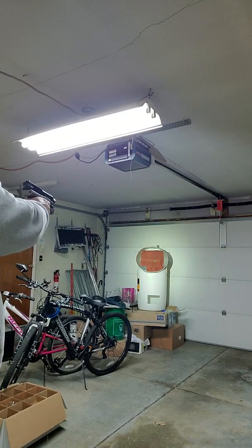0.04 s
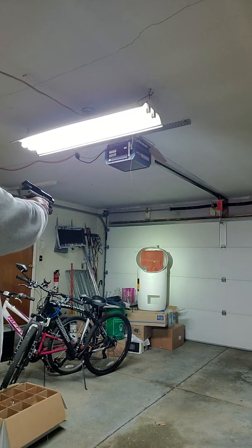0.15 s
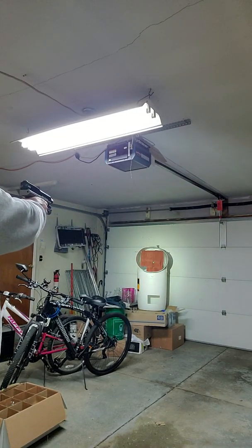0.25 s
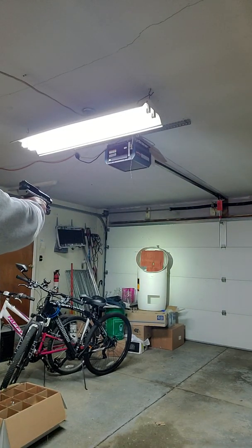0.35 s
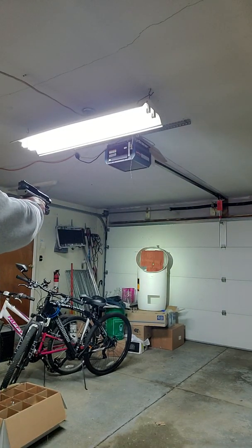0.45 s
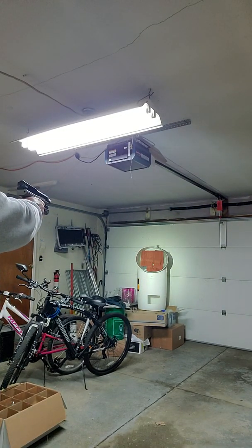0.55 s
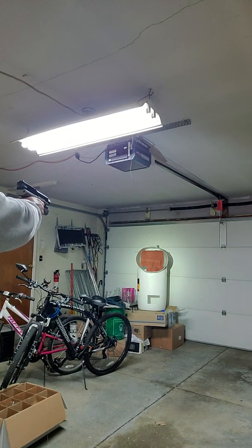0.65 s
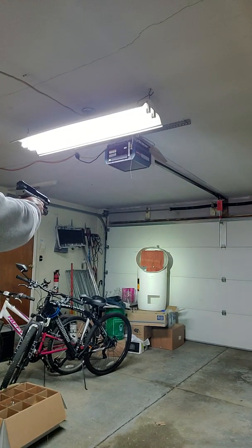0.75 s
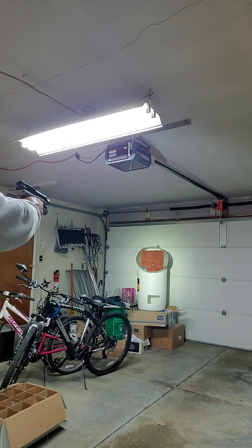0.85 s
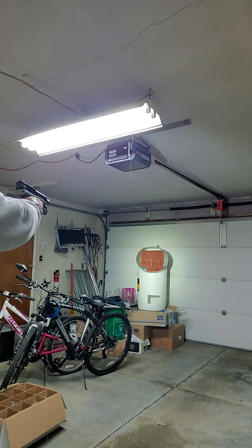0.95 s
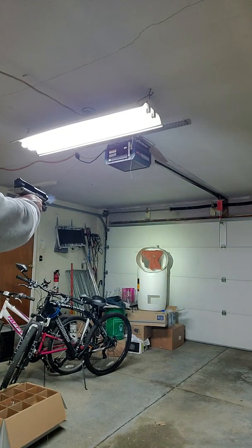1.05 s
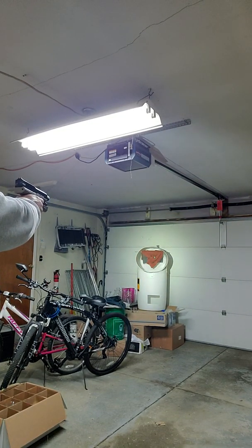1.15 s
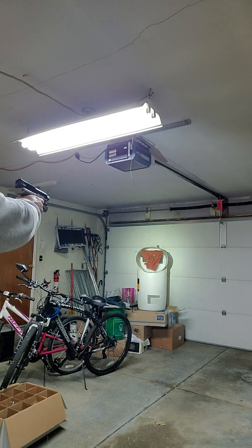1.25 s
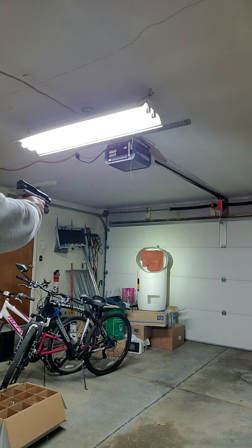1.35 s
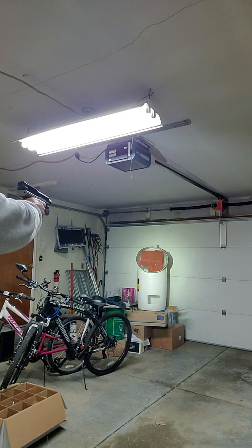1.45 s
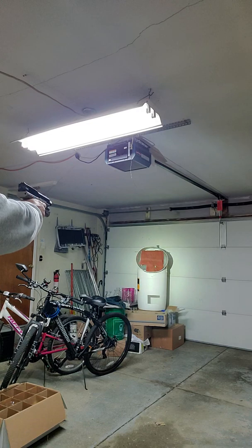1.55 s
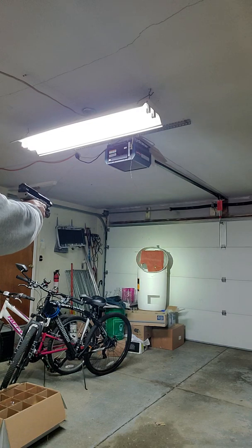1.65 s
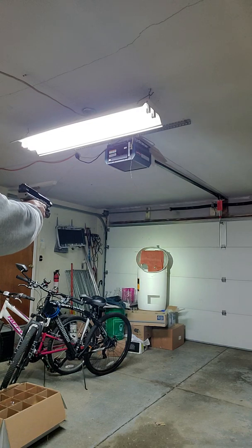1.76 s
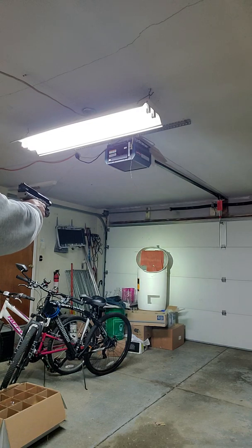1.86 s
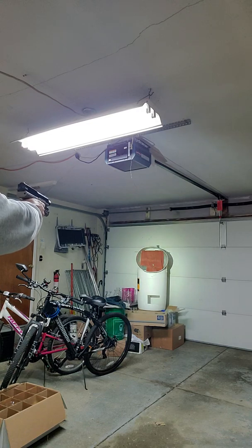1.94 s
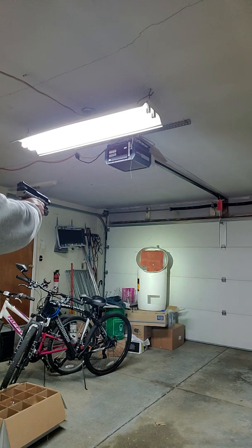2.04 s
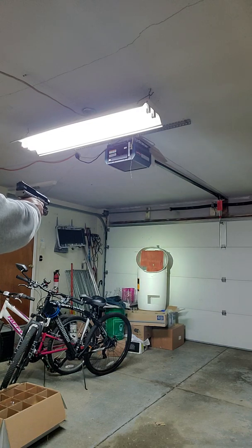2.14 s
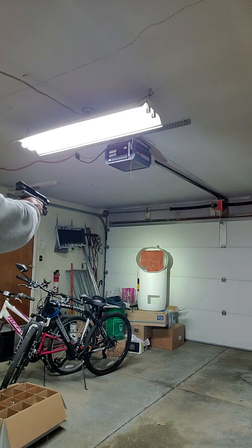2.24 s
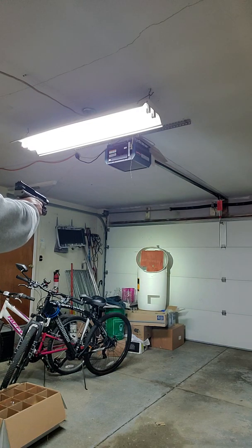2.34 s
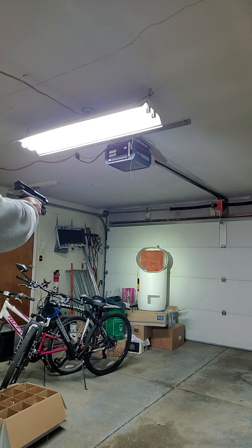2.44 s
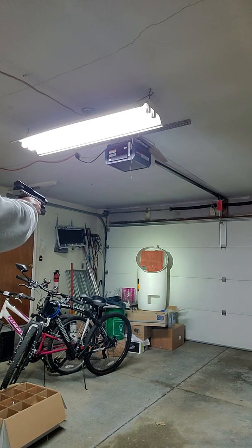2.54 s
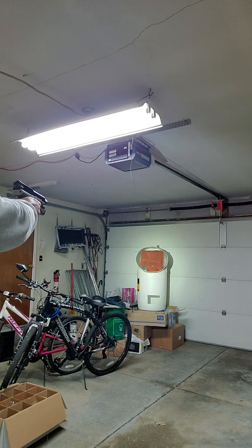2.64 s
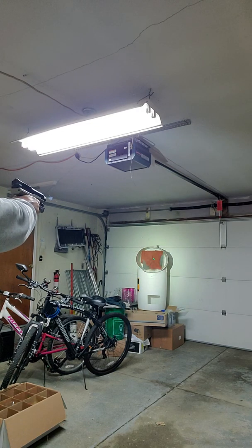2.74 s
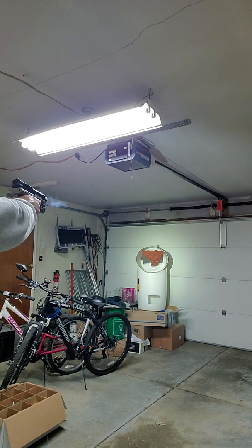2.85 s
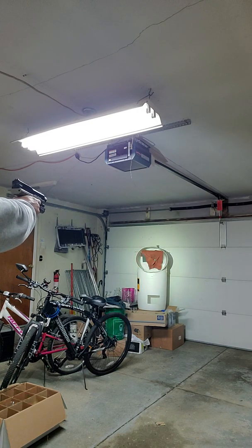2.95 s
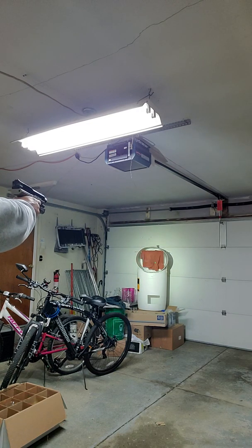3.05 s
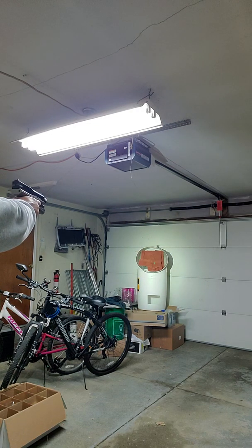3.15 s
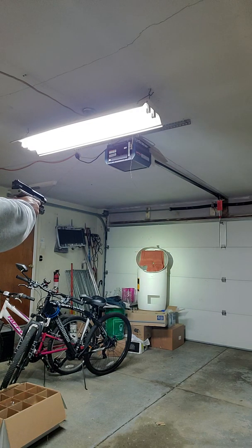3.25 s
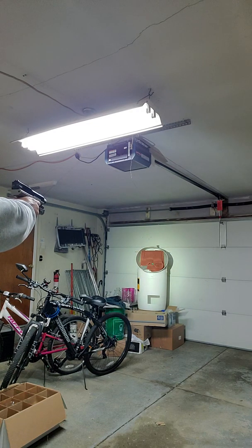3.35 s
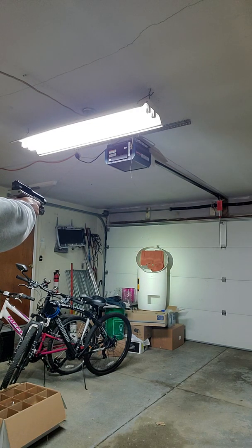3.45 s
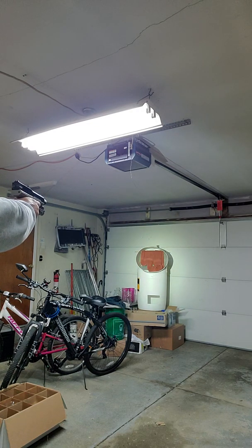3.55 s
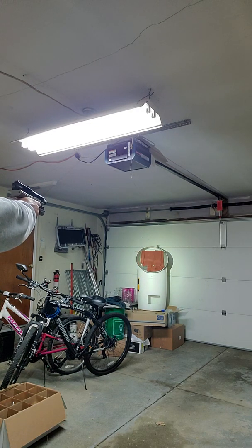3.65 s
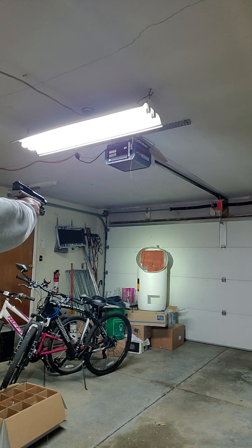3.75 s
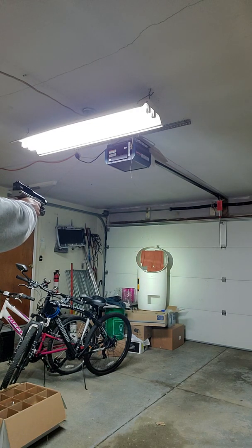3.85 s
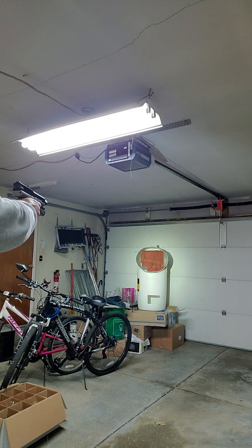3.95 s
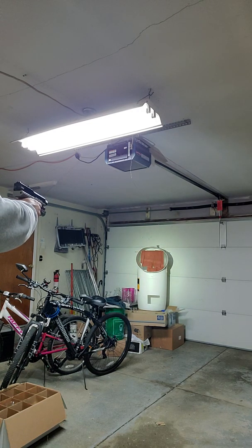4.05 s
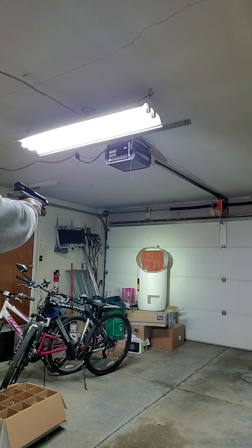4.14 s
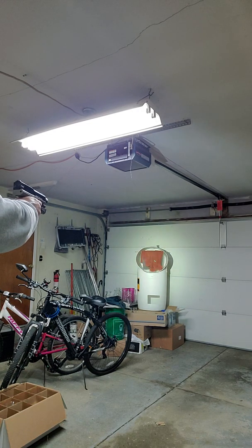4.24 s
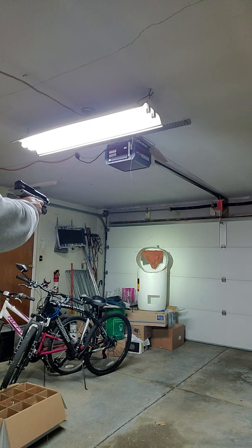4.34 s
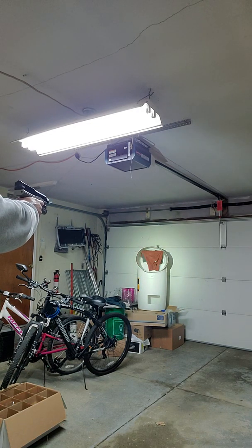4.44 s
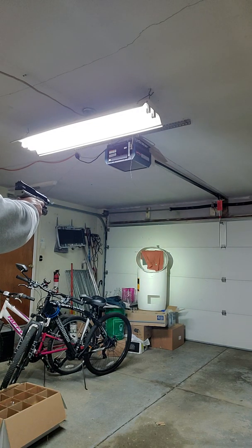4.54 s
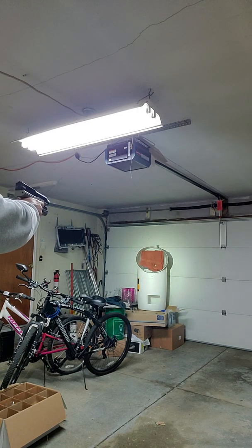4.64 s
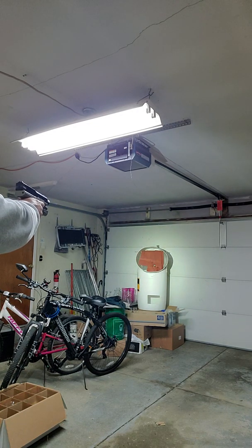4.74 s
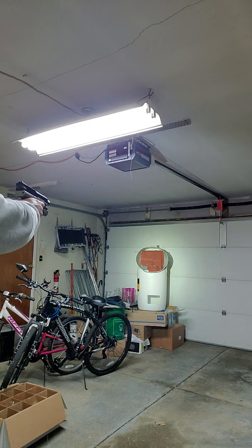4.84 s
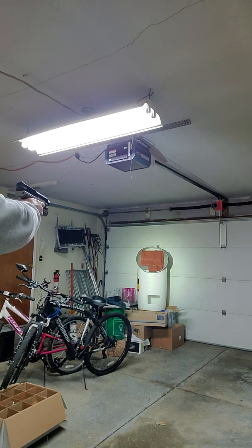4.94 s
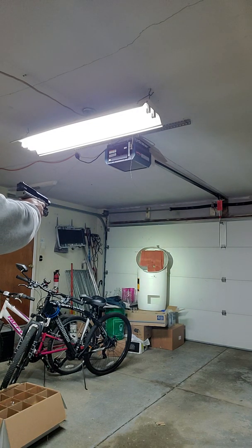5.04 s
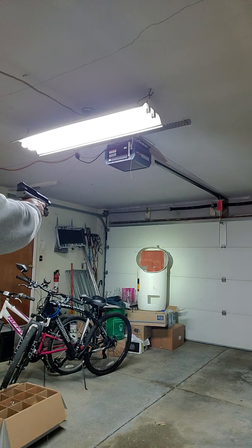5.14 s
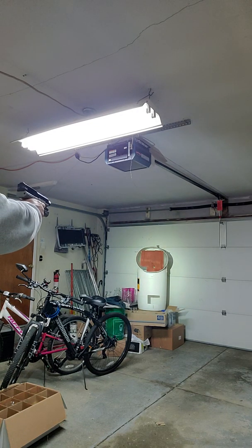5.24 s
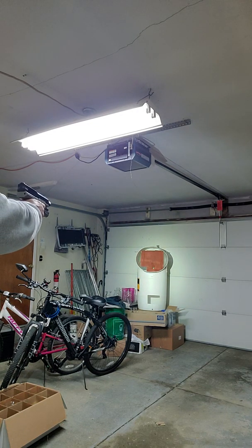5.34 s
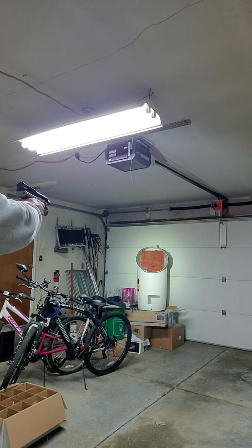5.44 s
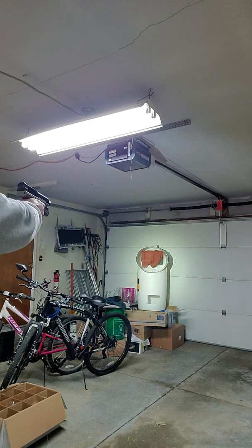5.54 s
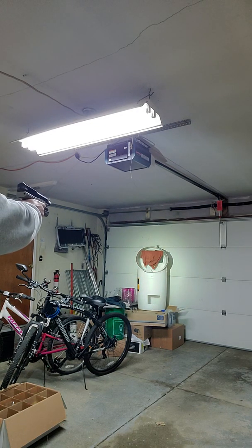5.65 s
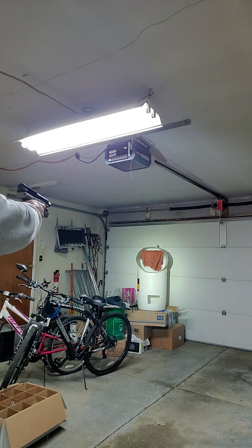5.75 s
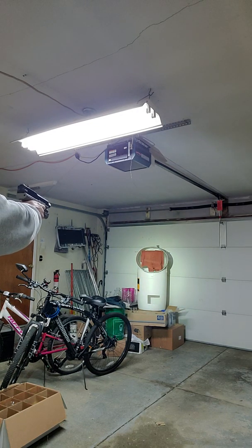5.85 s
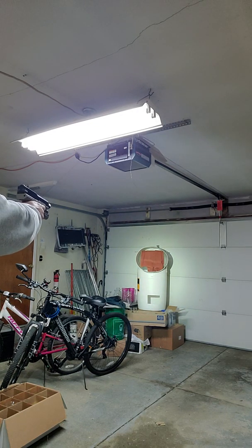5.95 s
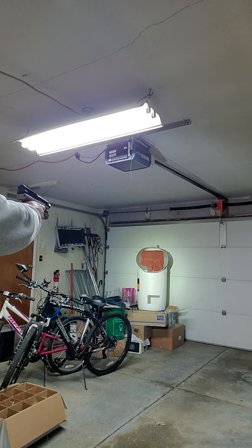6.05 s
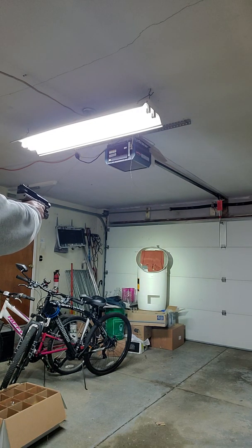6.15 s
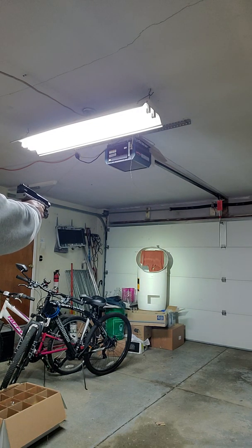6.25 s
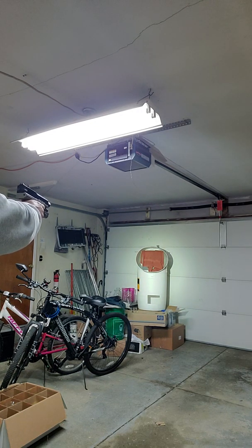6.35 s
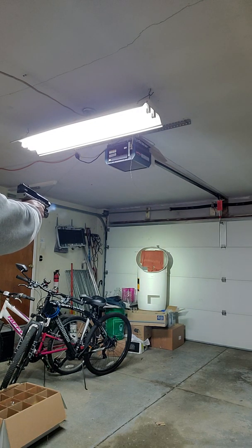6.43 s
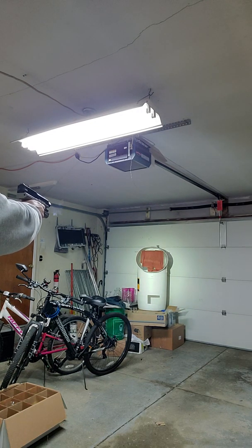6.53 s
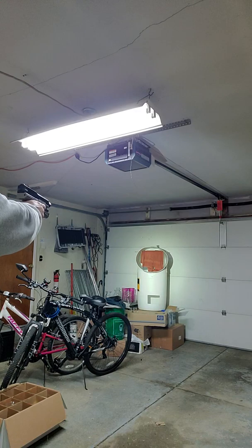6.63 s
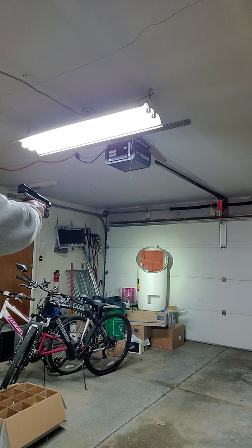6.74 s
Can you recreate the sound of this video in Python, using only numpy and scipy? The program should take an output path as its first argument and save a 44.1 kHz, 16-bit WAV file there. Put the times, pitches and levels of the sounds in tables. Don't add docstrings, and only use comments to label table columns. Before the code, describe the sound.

Five sharp gas-pistol shots crack in a concrete garage, each thumping a hollow target, with balls clacking and knocking around afterwards.

```python
import sys
import numpy as np
from scipy import signal
from scipy.fft import rfft, irfft
from scipy.io import wavfile
from scipy.ndimage import uniform_filter1d

SR = 44100
rng = np.random.default_rng(int(sys.argv[2]) if len(sys.argv) > 2 else 0)


def linear_from_db(decibels):
    return 10 ** (np.asarray(decibels, float) / 20)


def to_wav(sig):
    pcm = np.clip(np.atleast_2d(sig), -1, 1) * 32767
    pcm = np.round(pcm).astype(np.int16)
    wavfile.write(sys.argv[1], SR, pcm.T)


N = 299483
SPAN = 1 << 15
HZ, T = np.fft.rfftfreq(SPAN, 1 / SR), np.arange(SPAN) / SR
LEAD_IN_S = 0.04


def shot(blast_db, thump_db, cold, near, far):
    return heard(gun(blast_db, cold), near) + linear_from_db(thump_db) * heard(target(cold), far)


def gun(blast_db, cold):
    # (frequency [Hz], level [dB])
    blast_colour = [(35, -39.5), (60, -2), (809, -1), (1470, -5), (3240, -3.5), (6000, -16), (7800, -42),
                    (13200, -120)]
    # (frequency [Hz], level [dB])
    jet_colour = [(500, -22.5), (1500, -8), (3200, 5.5), (5000, 2.5), (7000, 8.5), (8500, -1.5),
                  (12000, -6.5), (16000, -2.5)]
    # (frequency [Hz], change [dB])
    chill = [(1000, -5), (3000, -11), (6000, 5.5), (8500, 7), (12500, 9)]
    valve_colour = [(300, 8.5), (1000, -9.5), (2000, 6.5), (3400, 3.5), (5000, -7.0), (14000, -30.5)]

    blast = colour(click(LEAD_IN_S), [(f, db + cold * read(chill, f)) for f, db in blast_colour])
    since = T - LEAD_IN_S
    leak = np.exp(np.minimum(since + 0.0067, 0) / 0.0052) * (since < 0)
    valve = puff(linear_from_db(-13 - 5.9 * cold) * leak, valve_colour)
    gust = np.exp(-np.maximum(since, 0) / 0.0032) * (since >= 0)
    jet = puff(gust, [(f, db + cold * read(chill, f)) for f, db in jet_colour])
    jet_db = -18.5 + 2.5 * cold
    return linear_from_db(blast_db) * blast / abs(blast).max() + linear_from_db(jet_db) * (jet + valve)


def target(cold):
    # (frequency [Hz], level [dB])
    slap_colour = [(40, -22), (110, -3), (220, -8), (380, 1.5), (560, -12), (1000, 1.5), (1700, -7),
                   (10000, -39)]
    # (frequency [Hz], change [dB])
    chill = [(100, 2), (200, 7.5), (400, 2), (750, -0.5), (1200, -14), (2800, -0.5), (5800, 22.5),
             (9000, -8.5)]
    # (frequency [Hz], level [dB], t60 [s])
    hollow_modes = [(68.6, -14.5, 0.32), (93.1, -8.5, 0.31), (110.6, 9, 0.21), (240, 5.5, 0.05),
                    (320, -3.5, 0.043), (359, 7.5, 0.44), (430, 3, 0.087), (478, 7, 0.18), (615, 1.5, 0.17),
                    (694, 4.5, 0.28), (783, 2, 0.2), (1110, -4.5, .15)]

    slap = colour(colour(click(), slap_colour), [(f, cold * db) for f, db in chill])
    boom = sum(ring(*mode) for mode in hollow_modes)
    thump = slap / abs(slap).max() + linear_from_db(-16.0) * boom / abs(boom).max()
    flight_s = .0265 - .0048 * cold ** 2
    return np.roll(thump, round((LEAD_IN_S + flight_s) * SR))


def bounce(db, thud_db, crack_db, fizz_db):
    ball_hz = 1115
    modes = [(ball_hz, 0, .012), (ball_hz * .6, -6, .02), (2900, 1.5, .006)]
    path = garage(rise_s=0.0054, early_db=5.0, early_s=0.036)
    return hit(db, ball_hz, thud_db, crack_db, fizz_db, modes, -18, path)


def knock(db, low_hz, crack_db, fizz_db):
    modes = [(low_hz, 0, 22 / low_hz), (low_hz * 1.28, -1, 17 / low_hz)]
    path = garage(rise_s=0.0087, early_db=8.5, early_s=.02)
    return hit(db, low_hz, -32.5, crack_db, fizz_db, modes, 1.0, path)


def hit(db, hz, thud_db, crack_db, fizz_db, modes, ring_db, path):
    # (frequency [Hz], level [dB])
    bass_loss = [(40, -44.5), (150, -4), (320, -6.5)]
    tick_colour = [(45, thud_db - 0.5), (110, thud_db + 22.5), (200, thud_db + 21.0),
                   (340, thud_db / 2 + 8), (hz, 0), (3000, crack_db + 0.5),
                   (6500, (crack_db + fizz_db) / 2 + 5.0), (12000, fizz_db - 0.5)]
    tick = colour(click(), sorted(tick_colour))
    rings = colour(sum(ring(*mode) for mode in modes), bass_loss)
    rings = colour(rings, [(0.6 * hz, -12), (0.9 * hz, 0)])
    dry_hit = tick / np.linalg.norm(tick) + linear_from_db(ring_db) * rings / np.linalg.norm(rings)
    sound = heard(dry_hit, path)
    return linear_from_db(db - 2.0) * sound / abs(sound.mean(0)).max()


def note(hz, db, t60, path):
    modes = ring(hz, db, t60) + ring(hz * 0.95, db - 4.0, t60 * .6) + ring(hz * .93, db - 5.0, t60 * 0.48)
    tone = modes * (1 - np.exp(-T / 0.0048))
    sound = heard(tone, path)
    return sound * abs(tone).max() / abs(sound).max()


def rattle(db, hz):
    path = garage(rise_s=0.015, early_db=14.5, early_s=0.047)
    return hit(db, hz, -25.5, 1.5, -35, [(hz, 0, .006)], -6.5, path)


def gun_spot():
    # (delay [s], level [dB])
    wall_echoes = [(.0025, 2), (.006, -19), (0.0085, -12), (0.02, -26)]
    walls = click() + sum(linear_from_db(db) * click(s) for s, db in wall_echoes)
    tail = garage(rise_s=0.0011, early_db=-5.5, early_s=0.003, lumpy_db=-0.85)
    return walls * [[1], [.8]] + linear_from_db(12.5) * tail


def target_spot():
    # (delay [s], level [dB])
    slap_echoes = [(.0012, -2), (.0039, -9.5), (.0068, -3.5), (.0087, -8), (0.009, -11.5)]
    slaps = click() + sum(linear_from_db(db) * click(s) for s, db in slap_echoes)
    tail = garage(rise_s=0.0017, early_db=9.0, early_s=.012, lumpy_db=-1.5)
    return slaps * [[1], [.8]] + linear_from_db(12.0) * tail


def garage(rise_s, early_db, early_s, patchy_db=1.0, lumpy_db=4.0):
    # (frequency [Hz], t60 [s])
    room_decay = [(60, 0.65), (160, 0.47), (420, 0.7), (1100, 0.58), (2500, 0.69), (5000, 0.6),
                  (8000, 0.43), (15000, .3)]
    density = np.minimum(20 * T + 0.046, 1)
    present = rng.random((2, SPAN)) < density
    taps = rng.standard_normal((2, SPAN)) * present / np.sqrt(density)
    hz, t, z = signal.stft(taps, SR, nperseg=256)
    clumps = uniform_filter1d(rng.standard_normal(z[0].shape), size=6, axis=0)
    clumps = uniform_filter1d(clumps, size=4, axis=1)
    lumps = rng.standard_normal((len(hz), 1)) * (0.37 + 0.6 * np.exp(-t / 0.043))
    fade_db = patchy_db * evened(clumps) + lumpy_db * lumps - 60 * t / read(room_decay, hz)[:, None]
    tail = signal.istft(z * linear_from_db(fade_db), SR, nperseg=256)[1][:, :SPAN]
    tail *= (1 - np.exp(-T / rise_s)) ** 2
    tail *= 1 + linear_from_db(early_db) * np.exp(-T / early_s)
    return tail / np.linalg.norm(tail[0])


def hum():
    # (frequency [Hz], level [dB])
    hum_lines = [(26.2, -64), (119, -57.5), (172.3, -71), (208.5, -61), (241, -64), (291.5, -65),
                 (316.5, -75), (414.8, -74), (570.6, -68), (664.5, -79), (690.5, -71.5), (811.5, -73),
                 (904, -84)]
    # (frequency [Hz], level [dB])
    air_colour = [(28, -4.5), (54, -22.5), (108, -3), (223, -6), (472, -14), (1100, -25), (2400, -42),
                  (4000, -58.5), (16000, -75.5)]
    # (frequency [Hz], likeness [0-1])
    air_likeness = [(60, 1), (240, 0.82), (950, 0.15), (3770, 0.02), (15000, 0.04)]

    frames, hz = N // 512 + 6, np.fft.rfftfreq(2048, 1 / SR)
    a, b, c, d = rng.standard_normal((frames, len(hz), 4)).T
    z = ports(a + 1j * b, c + 1j * d, read(air_likeness, hz)[:, None], 0, 0)
    z = z * linear_from_db(read(air_colour, hz))[:, None]
    air = linear_from_db(-51.5 - 5.0) * evened(signal.istft(z, nperseg=2048, noverlap=1536)[1][:, :N])

    waver = evened(uniform_filter1d(rng.standard_normal((len(hum_lines), N)), 5000, axis=1))
    f, db = np.transpose(hum_lines)[:, :, None]
    t = np.arange(N) / SR
    tones = np.sin(2 * np.pi * f * t + 0.5 * waver[::-1])
    return air + (np.sqrt(2) * linear_from_db(db + 0.84 * waver) * tones).sum(0)


def puff(envelope, points):
    z = rfft(envelope * rng.standard_normal(SPAN))
    flat = irfft(z / uniform_filter1d(abs(z), size=60), SPAN)
    burst = colour(flat, points)
    return burst * np.linalg.norm(envelope) / np.linalg.norm(burst)


def ring(hz, db, t60):
    return linear_from_db(db - 60 * T / max(t60, .003)) * np.sin(2 * np.pi * hz * T)


def click(s=0.):
    return 1. * (np.arange(SPAN) == round(s * SR))


def colour(x, points):
    log_gain = np.log(linear_from_db(np.maximum(read(points, HZ), -90)))
    phase = -signal.hilbert(np.r_[log_gain, log_gain[-2:0:-1]]).imag[:len(HZ)]
    return irfft(rfft(x, SPAN) * np.exp(log_gain + 1j * phase), SPAN)


def heard(dry, path):
    # (frequency [Hz], likeness [0-1])
    likeness = [(60, 0.99), (150, 0.99), (380, 0.91), (950, 0.3), (2400, 0.047), (6000, 0.29), (15000, 0.1)]
    # (frequency [Hz], left minus right [dB])
    balance = [(60, -1), (150, 1), (380, 0.5), (950, -1.5), (2380, -1.5), (5980, -4.5), (15000, -7)]
    a, b = rfft(path) * rfft(dry, SPAN)
    lead = 2 * np.pi * HZ * .0001
    both = irfft(ports(a, b, read(likeness, HZ), read(balance, HZ), lead), SPAN)
    return both * np.minimum((T[-1] - T) / 0.034, 1)


def ports(a, b, same, lean_db, lead):
    same = np.clip(same, 0, 1)
    right = same * a * np.exp(-1j * lead) + np.sqrt(1 - same ** 2) * b
    return np.array([a * linear_from_db(lean_db / 2), right * linear_from_db(-lean_db / 2)])


def evened(x):
    return x / np.sqrt(np.mean(x ** 2) + 1e-20)


def read(points, hz):
    f, value = np.transpose(points)
    return np.interp(np.log(hz + 1), np.log(f + 1), value)


def add(mix, s, sound):
    at = round(s * SR)
    sound = sound[:, max(-at, 0):]
    part = mix[:, max(at, 0):][:, :sound.shape[1]]
    part += sound[:, :part.shape[1]]


def scene():
    # (time [s], blast [dB], target thump [dB], chill of the cartridge [0-1])
    shots = [
        (0.9912, -1, -2, .1),
        (2.6928, -1.5, -2, .3),
        (4.1673, -0.5, -3, 0.2),
        (5.394, 0, -1.5, .1),
        (6.444, -5, -2, .95),
    ]
    # (time [s], peak [dB], thud [dB], crack [dB], fizz [dB])
    bounces = [
        (1.645, -16.5, -29, -14.5, -27.5),
        (1.878, -8, -40, -9, -31.5),
        (2.309, -4.5, -26, -5, -27.5),
        (2.802, -7, -17, -9, -17.5),
        (3.471, -3.5, -30.5, -5, -21),
        (3.767, -38, -40, -42, -50),
        (5.789, -34, -21, 3, -14),
        (6.013, -3, -28, -7.5, -19.5),
        (6.304, -24, -26, -8, -43),
    ]
    # (peak [dB], thud [dB], crack [dB], fizz [dB])
    earlier_bounce = (-9.5, -17, -7, -33)
    # (time [s], peak [dB], low ring [Hz], crack [dB], fizz [dB])
    knocks = [(0.113, -36.5, 1085, -48, -45), (0.361, -51, 914, -24, -35), (1.724, -16, 1340, -15, -34.5),
              (3.324, -14, 849, -14, -24), (3.9, -45, 803, -20, -51.5), (4.096, -51.5, 1110, -32, -32.5),
              (4.857, -12, 843, -11, -25), (5.304, -7, 440, -39, -50), (5.527, -3.5, 840, -7.5, -22),
              (5.888, -14.5, 942, -7, -21), (6.23, -21.5, 950, -6, -33.5)]
    # (time [s], frequency [Hz], level [dB], t60 [s])
    thin_notes = [(1.881, 456, -35.5, 0.25), (2.309, 466.4, -31.5, 0.55), (3.324, 927, -33, 0.3),
                  (3.471, 474, -31.5, 0.46), (3.471, 855, -13.5, 0.13), (4.857, 785, -35.5, 0.21),
                  (4.857, 1216, -29, 0.34), (5.306, 358.5, -17.5, 0.34), (5.527, 821, -33, 0.22),
                  (5.891, 938, -21.5, 0.28), (6.014, 463, -25.5, 0.33), (6.014, 820, -16.5, 0.18),
                  (6.229, 1147, -24.5, 0.15)]
    # (time [s], peak [dB], ring [Hz])
    rattles = [
        (1.748, -22.5, 1870),
        (3.6, -21.5, 1300),
        (5.57, -15.5, 1300),
        (6.243, -24, 1010),
    ]

    mix = hum()
    near, far = gun_spot(), target_spot()
    for s, *row in shots:
        add(mix, s - LEAD_IN_S, shot(*row, near, far))
    add(mix, -.12, bounce(*earlier_bounce))
    for s, *row in bounces:
        add(mix, s - .005, bounce(*row))
    for s, *row in knocks:
        add(mix, s - .005, knock(*row))
    aside = click() + linear_from_db(0.5) * garage(rise_s=0.0071, early_db=2.0, early_s=0.026, lumpy_db=-0.2)
    for s, *row in thin_notes:
        add(mix, s - .003, note(*row, aside))
    for s, *row in rattles:
        add(mix, s - .012, rattle(*row))
    return mix


def top_cut(x):
    return signal.sosfilt(signal.butter(12, 16780, fs=SR, output="sos"), x)


def record(dry):
    # (frequency [Hz], level [dB])
    mic_response = [(30, -16.5), (120, -2.5), (5000, 3), (8500, -1.5), (12000, 12.5), (15600, 3),
                    (16100, -22.5)]
    taps = signal.firwin2(1023, HZ[::16], linear_from_db(read(mic_response, HZ[::16])), fs=SR)
    x = signal.oaconvolve(dry, taps[None], "same")
    power_db = 10 * np.log10(abs(uniform_filter1d((x ** 2).mean(0), 400)) + 1e-12)
    fall = np.arange(N) * 7.6 / SR
    held_db = np.maximum.accumulate(power_db + fall) - fall
    over_db = np.maximum(held_db + 24, 0)
    x = x / linear_from_db(0.19 * uniform_filter1d(over_db, 200))
    x = 1.326 * np.tanh(x / 1.265)
    edge = signal.firwin(255, 16300, window=("kaiser", 5), fs=SR)
    return top_cut(signal.oaconvolve(x, edge[None], "same"))


dry = scene()
out = record(dry)
to_wav(out)
```